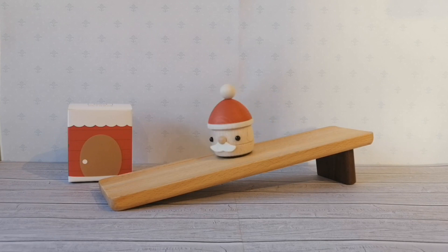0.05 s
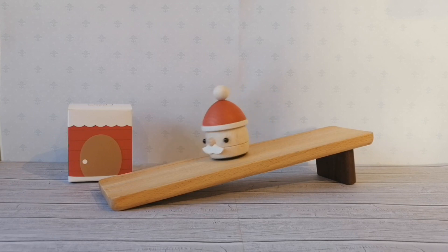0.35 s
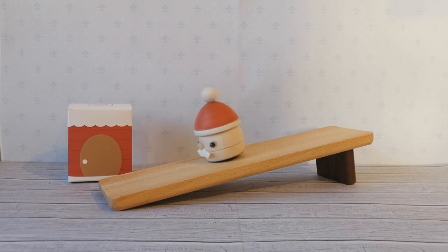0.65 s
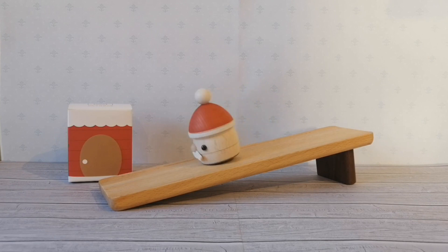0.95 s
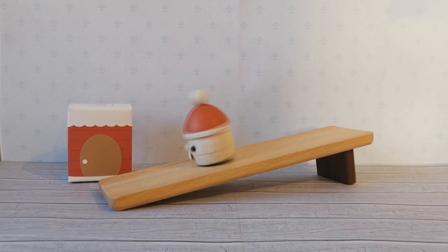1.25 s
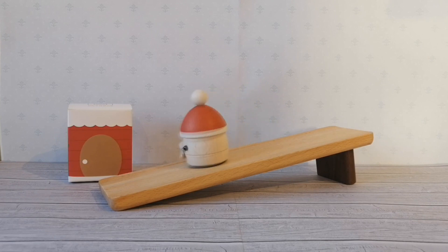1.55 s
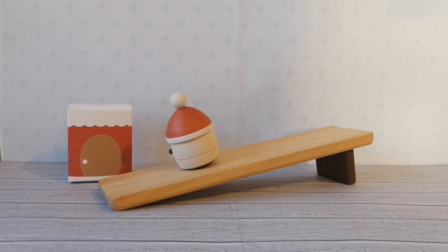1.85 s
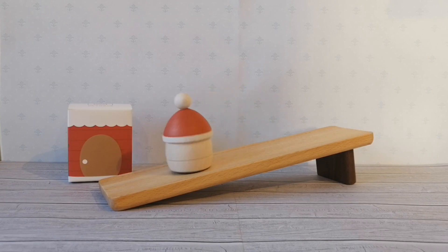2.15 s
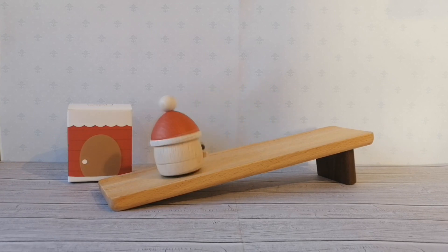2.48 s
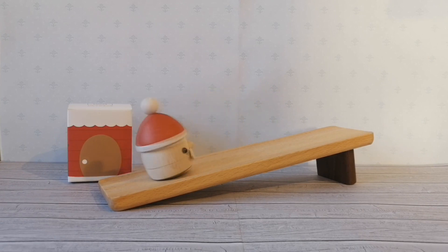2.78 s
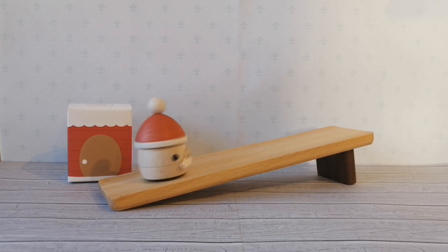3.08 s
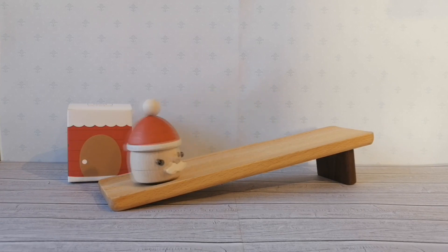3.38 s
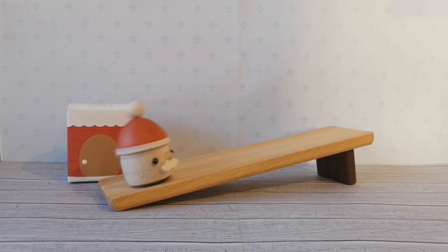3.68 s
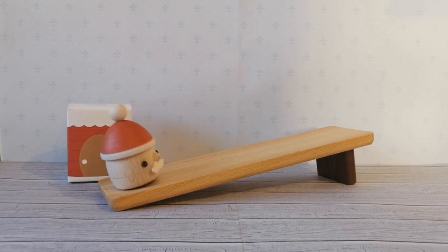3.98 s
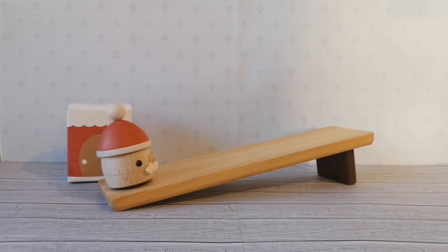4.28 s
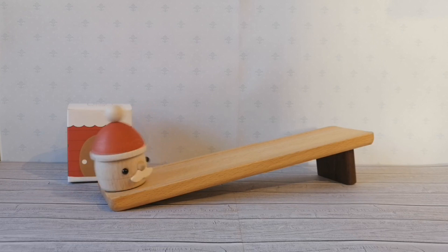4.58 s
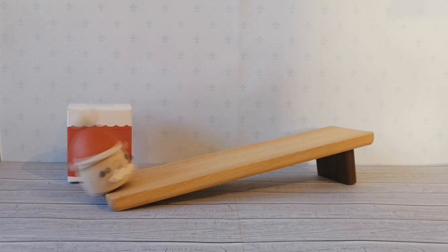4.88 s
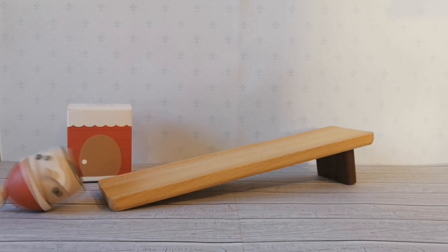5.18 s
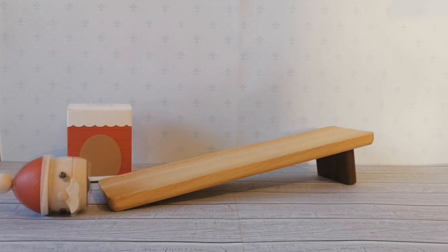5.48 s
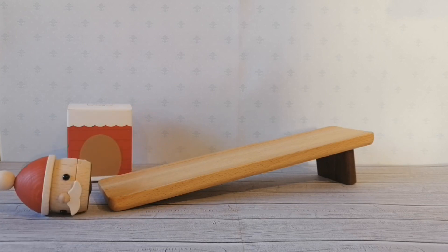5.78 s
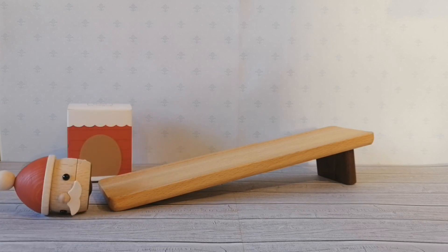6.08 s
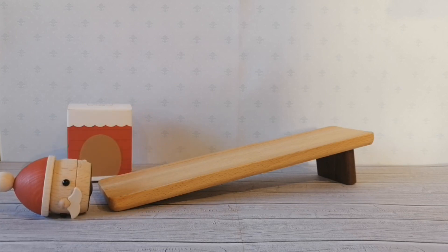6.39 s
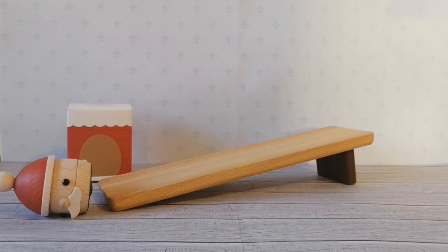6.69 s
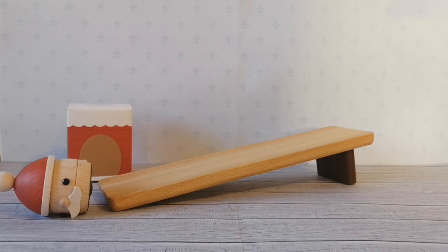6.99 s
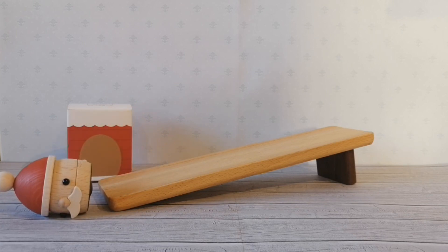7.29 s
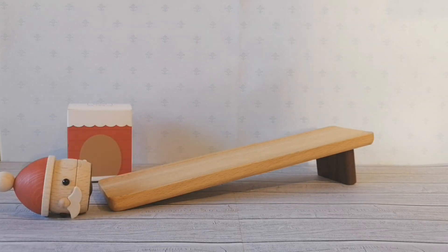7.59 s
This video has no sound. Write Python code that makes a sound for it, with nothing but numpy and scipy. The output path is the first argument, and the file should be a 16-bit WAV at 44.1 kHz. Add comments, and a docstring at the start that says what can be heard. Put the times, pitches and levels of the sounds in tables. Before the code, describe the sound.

A small wooden toy clacks unevenly down a wooden ramp, then topples onto a table and clatters to rest in a quiet room.

```python
"""A wooden walking toy waddles down a small wooden ramp on a table, rocking from foot to foot about
four times a second. Each step thuds in the table, rings the plank and clacks in the toy, whose sole
skids and whose loose leg ticks against its stops. At the foot of the ramp it topples onto the table,
bounces and rattles to rest. Blows are decaying wood modes plus bursts of shaped noise, heard by two
close microphones in a small, quiet room."""
import sys
import numpy as np
from scipy import signal
from scipy.fft import rfft, irfft
from scipy.io import wavfile
from scipy.ndimage import uniform_filter1d

SR = 44100
rng = np.random.default_rng(int(sys.argv[2]) if len(sys.argv) > 2 else 0)


def pcm_store(signal):
    """Save signal as 16-bit PCM."""
    levels = np.round(np.clip(np.atleast_2d(signal), -1, 1) * 32767)
    wavfile.write(sys.argv[1], SR, levels.astype(np.int16).T)


N = 337365
HIT_T = np.arange(SR // 4) / SR  # seconds within one hit

# Footfalls: each rings the plank and clacks in the toy; the plank rings least midway down the ramp, most at its
# free end. Each row: start in seconds, plank level in dB, toy level in dB.
FOOTFALLS = [(0.0755, -31, -46), (0.1111, -22, -21), (0.172, -37.5, -39), (0.23, -39.5, -52),
             (0.3003, -22.5, -28), (0.351, -27, -26.5), (0.426, -28.5, -35.5), (0.478, -45, -53),
             (0.5352, -26.5, -30.5), (0.5999, -24.5, -25), (0.6704, -32, -29.5), (0.7776, -26, -30),
             (0.836, -32, -28.5), (1.0328, -23.5, -26.5), (1.0957, -32.5, -39.5), (1.1512, -34.5, -50),
             (1.3039, -27.5, -26), (1.3557, -28, -23), (1.4211, -26.5, -24), (1.5279, -32.5, -41.5),
             (1.5945, -36.5, -30.0), (1.7394, -31, -36.5), (1.777, -38.0, -38.5), (1.9657, -40.5, -23),
             (2.01, -32.5, -21.5), (2.1342, -42.5, -33.5), (2.2121, -39, -22.0), (2.319, -49, -33.5),
             (2.388, -32, -27), (2.579, -38, -26), (2.7369, -36, -30.5), (2.927, -25.5, -34.5),
             (2.946, -32.5, -23.5), (3.022, -29, -34.5), (3.1382, -33.0, -35), (3.193, -29.5, -34.0),
             (3.3537, -24, -28.5), (3.3761, -34, -27.5), (3.443, -29.5, -30.5), (3.6248, -28.5, -36.5),
             (3.652, -32, -40), (3.7061, -33.5, -40), (3.8061, -30.5, -39.5), (3.884, -26.5, -28),
             (3.9669, -24.5, -30), (4.015, -32.5, -37), (4.0747, -28, -36.5), (4.154, -27, -30.5),
             (4.222, -25.5, -29.5), (4.356, -22, -37), (4.374, -27.5, -38), (4.4384, -25.5, -28),
             (4.5853, -17, -30.5), (4.605, -21.5, -25.5), (4.6648, -18.5, -32), (4.784, -38.5, -58),
             (4.8109, -28.5, -47), (4.873, -38, -56), (4.914, -26.5, -39.5), (5.001, -17, -22.5)]
# A usual step along the ramp. Each row: time in seconds, thud in dB, thud centre in Hz, skid in dB.
RAMP_PATH = [(0, -28.5, 210, -52), (1.5, -28.5, 241, -39.5), (2.199, -27.5, 193.5, -37.5),
             (2.75, -26.5, 183, -66.5), (3.4, -27.5, 190, -76), (4.1, -34.5, 183, -58.5),
             (5, -36, 230, -48)]
# Plank ring, toy clack and table thud. Each row: pitch in Hz, relative level in dB, t60 in seconds.
PLANK_MODES = [(502.2, -18.5, 0.12), (810.5, -9, 0.12), (1032.3, 8, 0.044), (1144, -6, 0.17)]
TOY_MODES = [(1538, -9.5, 0.068), (1725, -5.5, 0.074), (1856, 2.5, 0.019), (3134, -17, 0.05)]
THUD_MODES = [(177.6, -4, 0.15), (193.3, -2, 0.24), (284.14, 3.5, 0.19), (327.7, -14.5, 0.27),
              (493.6, -5, 0.17)]
# Noise of the dull knock, the clack and the skid. Each row: frequency in Hz, relative level in dB.
KNOCK_EQ = [(70, -34.5), (150, -4.5), (290, 0.5), (400, -13.5), (510, -2), (950, -9), (1350, -10),
            (7000, -61.5)]
CLACK_EQ = [(500, -14.5), (1350, -9), (1850, 9.5), (2700, -5), (3200, -15.5), (4100, -24.5), (5500, -32.5),
            (12000, -70)]
SKID_EQ = [(900, -10.5), (2200, 13.5), (2700, 0.5), (3400, 2.5), (5000, -12.5), (8000, -33.5)]


def steps(usual_db=-27, plank_pan_db=-2.5):
    """A foot lands and skids: toy and plank ring at once, the table swells more slowly."""
    out = np.zeros((2, N))
    pan = undb(np.array([[1], [-1]]) * plank_pan_db / 2)
    when, *curves = np.transpose(RAMP_PATH)
    for s, plank_db, toy_db in FOOTFALLS:
        force_db = 10 * np.log10(undb(plank_db) ** 2 + undb(toy_db) ** 2) - usual_db
        thud_db, thud_hz, skid_db = (np.interp(s, when, curve) for curve in curves)
        plank = pan * ring(repitch(PLANK_MODES), spread=0.62, rise_s=0.00089)
        toy = ring(repitch(TOY_MODES), spread=0.56)
        # a harder contact wakes more of the toy's dense high modes
        toy += undb(-8.5 + 0.25 * force_db) * grain(CLACK_EQ, t60=0.052)
        knock = undb(-34 + 0.72 * force_db) * grain(KNOCK_EQ, t60=0.06, width=0.37)
        thud = ring(favour(THUD_MODES, thud_hz, slope_db=7.5), spread=0.14, rise_s=0.0025)
        thud *= undb(thud_db + 0.51 * force_db)
        skid = undb(skid_db + force_db) * rattle(SKID_EQ, t60=0.097, rough_db=7.5, rise_s=0.0087)
        add(out, s, undb(plank_db) * plank + undb(toy_db) * toy + knock + thud + skid)
    return out


# Soft pushes on the table. Each row: start in seconds, level in dB, centre in Hz.
SOLE_ROLLS = [(0.006, -29.5, 191), (0.305, -31, 278), (0.542, -29, 288), (0.735, -29, 179),
              (0.972, -25.5, 190), (1.043, -27.5, 290), (1.246, -27.5, 183), (1.535, -28.5, 291),
              (1.685, -27.5, 188), (1.746, -31.5, 270), (1.903, -30, 170), (1.973, -25.5, 276),
              (2.089, -29.5, 287), (2.396, -24.5, 191), (2.632, -25.5, 178), (2.859, -25.5, 178),
              (3, -26.5, 179), (3.282, -30.5, 169), (3.449, -31, 190), (3.687, -28.5, 215),
              (3.926, -32.5, 167), (4.293, -32, 243), (4.666, -29, 171), (4.89, -28, 223),
              (5.621, -30, 175)]


def sole_rolls():
    """The rounded sole rolls over without a click; only the table's low modes answer."""
    out = np.zeros((2, N))
    for s, db, centre_hz in SOLE_ROLLS:
        modes = favour(THUD_MODES, centre_hz, slope_db=14.0)
        add(out, s, undb(db) * ring(modes, spread=0.11, rise_s=0.0022))
    return out


# Leg ticks, on the ramp and in the tumble. Each row: start in seconds, strength in dB.
LEG_TICKS = [(0.036, -57.5), (0.2863, -50), (0.5295, -53.5), (0.769, -42.5), (0.9125, -61), (1.0194, -49),
             (1.5226, -41), (1.7315, -45.5), (1.951, -53), (2.3178, -54), (2.4257, -43), (2.7162, -57.5),
             (3.319, -60.5), (3.353, -52), (3.8032, -42), (4.0135, -39.5), (4.068, -47.5), (4.555, -61),
             (4.61, -48), (4.7557, -62.5), (5.547, -35), (5.58, -45)]
# The leg's tiny ping. Each row: pitch in Hz, relative level in dB, t60 in seconds.
LEG_MODES = [(4500, 0, 0.007)]
# Its bright buzz and dry snap. Each row: frequency in Hz, relative level in dB.
BUZZ_EQ = [(2000, -8.5), (4500, 0.5), (5200, -13), (6200, -6.5), (8500, -29)]
SNAP_EQ = [(500, -11), (1700, 21), (3200, 8), (6500, -19), (14500, -46.5)]


def leg_ticks(usual_db=-48):
    """The small, hard, loose leg snaps against its stop and buzzes for an instant."""
    out = np.zeros((2, N))
    for s, db in LEG_TICKS:
        ping = undb(db + 8) * ring(repitch(LEG_MODES, scatter=0.035), spread=1.0)
        buzz = undb(db - 6) * grain(BUZZ_EQ, t60=0.046)
        snap = undb(-32 + 0.6 * (db - usual_db)) * grain(SNAP_EQ, t60=0.013)
        add(out, s, ping + buzz + snap)
    return out


# The body bouncing on the table. Each row: start in seconds, knock in dB, crack in dB.
BODY_HITS = [(5.077, -14, -31.5), (5.083, -19, -15.5), (5.089, -12, -25), (5.11, -13, -7.5),
             (5.117, -14, -8), (5.16, -25, -23), (5.205, -17, -22), (5.361, -9.5, -11),
             (5.383, -19.5, -32.5), (5.518, -15.5, -21.5), (5.61, -15.5, -24.5)]
# The hat knocking as the toy rolls about. Each row: start in seconds, level in dB.
HAT_HITS = [(5.115, -18), (5.152, -14), (5.218, -18.5), (5.545, -12), (5.576, -19), (5.698, -19.5)]


def tumble(calming_db_per_s=57):
    """The toy hits the table with body and hat; the body blows shake its loose parts into a clatter."""
    out = np.zeros((2, N))
    for s, knock_db, crack_db in BODY_HITS:
        calmed_db = calming_db_per_s * (s - BODY_HITS[0][0])  # the toy loses speed
        clatter = rattle(CRACK_EQ, t60=0.18, rough_db=1.5, rise_s=0.0048)
        blow = table_blow(knock_db, hat_db=crack_db - 16.5, crack_db=crack_db)
        add(out, s, blow + undb(crack_db - 17 - calmed_db) * clatter)
    for s, db in HAT_HITS:
        add(out, s, table_blow(knock_db=db - 4.5, hat_db=db, crack_db=db - 8))
    # the blows carry little deep bass
    return signal.sosfilt(signal.butter(2, 175, "highpass", fs=SR, output="sos"), out)


# Ring of the table top and of the hat. Each row: pitch in Hz, relative level in dB, t60 in seconds.
TABLE_MODES = [(194.2, -9.5, 0.25), (285.4, 3.5, 0.16), (329.7, -10.5, 0.43), (510, -1, 0.21),
               (597.4, -1, 0.16), (687, 2.5, 0.084), (773, 2.5, 0.059), (820, 7.5, 0.071),
               (908, 7.5, 0.027), (1099, 3.5, 0.079), (1680, 1.5, 0.069)]
HAT_MODES = [(2150, 0.5, 0.025), (2287, 2, 0.032), (2420, -0.5, 0.028)]
# The bite of crack and clatter. Each row: frequency in Hz, relative level in dB.
CRACK_EQ = [(700, -2.5), (1600, 20), (3000, 3.5), (4800, -5), (6500, -12), (12000, -28.5), (14000, -55)]


def table_blow(knock_db, hat_db, crack_db):
    """One blow of the toy on the bare table: a woody knock, the ring of the hat and a short crack."""
    knock = ring(TABLE_MODES, spread=0.2, rise_s=0.00055)
    knock += undb(-8.5) * grain(KNOCK_EQ, t60=0.1)
    knock += undb(-16) * ring(TOY_MODES, spread=0.9)
    hat = ring(HAT_MODES, spread=0.45)
    crack = grain(CRACK_EQ, t60=0.011)
    return undb(knock_db) * knock + undb(hat_db) * hat + undb(crack_db) * crack


# The last to-and-fro roll, fading to rest. Each row: time in seconds, level in dB.
SETTLING_FADER = [(5.661, -43.5), (5.82, -56.5), (5.98, -54), (6.08, -87)]


def settling():
    """The fallen toy rolls over the grain of the table, which murmurs in its lower modes."""
    bumps = rng.standard_normal((1, N))
    rolling = signal.fftconvolve(bumps, ring(TABLE_MODES, spread=0.19), axes=1)[:, :N]
    murmur = colour(rolling, [(190, 2.5), (300, -6.0), (500, -6.5), (900, -24)])
    level_db = np.interp(np.arange(N) / SR, *np.transpose(SETTLING_FADER), left=-np.inf, right=-np.inf)
    return undb(level_db) * unit(murmur)


def ring(modes, spread, rise_s=0.00017, scatter_db=1.5, detune=0.003):
    """One blow on a set of modes, weighted anew by each contact; spread parts their phases in stereo."""
    hz, db, t60 = np.transpose(modes)[:, :, None]
    size, shift, turn = rng.standard_normal((3, len(modes), 1))
    envelope = undb(db + scatter_db * size) * fade(HIT_T, t60) * attack(HIT_T, rise_s)
    phase = 2 * np.pi * hz * (1 + detune * shift) * HIT_T
    sound = np.array([(envelope * np.sin(phase + side * spread * turn)).sum(0) for side in (1, -1)])
    return sound / np.abs(sound).max()


def repitch(modes, scatter=0.012):
    """The toy bears on another spot at each contact, which shifts the modes a little."""
    shift = 1 + scatter * rng.standard_normal()
    return [(hz * shift, db, t60) for hz, db, t60 in modes]


def favour(modes, centre_hz, slope_db):
    """A contact drives best the modes near its own pace; the others lose slope_db an octave."""
    return [(hz, db - slope_db * abs(np.log2(hz / centre_hz)), t60) for hz, db, t60 in modes]


def grain(spectrum, t60, width=0.71):
    """Countless short-lived modes as a noise burst, partly unlike at the two microphones."""
    mid, side = colour(rng.standard_normal((2, len(HIT_T))), spectrum)
    noise = unit(np.array([mid + width * side, mid - width * side]))
    return noise * fade(HIT_T, t60) * (1 - fade(HIT_T, 0.002)) ** 2


def rattle(spectrum, t60, rough_db, rise_s, contacts_per_s=700):
    """Wood skidding or clattering on wood: a dense run of uneven tiny contacts that dies away."""
    n = len(HIT_T)
    sizes = undb(rough_db * np.repeat(rng.standard_normal(n), SR // contacts_per_s)[:n])
    run = unit(colour(sizes * rng.standard_normal((2, n)), spectrum))
    return run * fade(HIT_T, t60) * attack(HIT_T, rise_s)


# The toy drifts left. Each row: time in seconds, lag of the right microphone in seconds.
RIGHT_LAG = [(0, 0.000018), (5.1, 0.00021)]


def add(out, s, sound):
    """Place a stereo hit at time s; it reaches the right microphone a little later."""
    lag_s = np.interp(s, *np.transpose(RIGHT_LAG))
    for channel, start in enumerate((s, s + lag_s)):
        i = max(int(start * SR), 0)
        part = sound[channel, :N - i]
        out[channel, i:i + len(part)] += part


# Early reflections. Each row: left delay in seconds, right delay in seconds, gain.
WALL_ECHOES = [(.0041, 0.0038, 0.45), (0.016, 0.017, 0.34)]
# Length of the reverb tail. Each row: frequency in Hz, t60 in seconds.
TAIL_DECAY = [(280, .33), (650, .47), (2500, .45), (12000, .28)]
# Its warm tone. Each row: frequency in Hz, relative level in dB.
TAIL_EQ = [(100, 4.5), (280, 2.5), (420, 5), (600, 1.5), (1000, -5.5), (2000, -4)]


def room(dry, wet_db, build_s):
    """Two near wall echoes, then a diffuse tail whose top end dies first."""
    t = np.arange(SR) / SR
    hz = np.fft.rfftfreq(SR, 1 / SR)
    mid, side = rfft(rng.standard_normal((2, SR)))
    likeness = 0.97 * np.sinc(hz / 1700)  # the bass is alike at both microphones
    noise = mid * np.sqrt(1 + likeness) + np.outer([1, -1], side * np.sqrt(1 - likeness))
    noise *= undb(along(TAIL_EQ, hz))
    centres, t60s = np.transpose(TAIL_DECAY)
    bands = [along(np.c_[centres, share], hz) for share in np.eye(len(t60s))]
    tail = sum(irfft(noise * band, SR) * fade(t, t60) for band, t60 in zip(bands, t60s))
    response = undb(wet_db) * unit(tail * attack(t, build_s)) / np.sqrt(SR)
    response[:, 0] += 1  # direct sound
    for left_s, right_s, gain in WALL_ECHOES:
        response[[0, 1], [int(left_s * SR), int(right_s * SR)]] += gain
    response = even(response, narrow_hz=40, wide_hz=260)
    return signal.fftconvolve(dry, response, axes=1)[:, :N]


def even(response, narrow_hz, wide_hz):
    """Level the narrow peaks and dips of a one-second response so that no single note sticks out."""
    spectrum = rfft(response)
    power = np.abs(spectrum) ** 2
    narrow, wide = (uniform_filter1d(power, width) + 1e-9 for width in (narrow_hz, wide_hz))
    cepstrum = irfft(np.log(wide / narrow))
    cepstrum[:, 0] /= 2
    cepstrum[:, SR // 2:] = 0  # minimum phase: no pre-ringing
    return irfft(spectrum * np.exp(rfft(cepstrum)))


# Room tone, heavy in the lows. Each row: frequency in Hz, relative level in dB.
ROOM_TONE_EQ = [(22, -5), (75, -1), (115, -2), (170, -16), (700, -28.5), (3000, -36.5), (7500, -52.5),
                (14500, -65.5)]


def background(air_db=-50.08, drone_db=-53.5):
    """Low rumble of the building with a wavering drone, under faint hiss."""
    mid, side = colour(rng.standard_normal((2, N)), ROOM_TONE_EQ)
    side = colour(side, [(100, -14), (600, 0)])  # nearly mono in the bass
    air = unit(mid + np.outer([1, -1], side))
    drone_band = signal.butter(2, [67, 75], "bandpass", fs=SR, output="sos")
    drone = unit(signal.sosfilt(drone_band, rng.standard_normal(N)))
    return undb(air_db) * air + undb(drone_db) * drone


def undb(db):
    """Decibels to gain."""
    return 10 ** (np.asarray(db) / 20)


def along(points, hz):
    """Read (Hz, value) points on a log-frequency axis."""
    f, value = np.transpose(points)
    return np.interp(np.log(np.maximum(hz, 1)), np.log(f), value)


def colour(x, points):
    """EQ a sound with a (Hz, dB) curve."""
    n = x.shape[-1]
    return irfft(rfft(x) * undb(along(points, np.fft.rfftfreq(n, 1 / SR))), n)


def unit(x):
    """Scale to rms 1."""
    return x / np.sqrt(np.mean(x ** 2))


def attack(t, rise_s):
    """Smooth onset from 0 to 1."""
    return 1 - np.exp(-(t / rise_s) ** 2)


def fade(t, t60):
    """Exponential decay, 60 dB down at t60."""
    return np.exp(-np.log(1000) * t / t60)


def scene():
    """The toy's walk and fall, heard in the room."""
    toy = steps() + sole_rolls() + leg_ticks() + tumble() + settling()
    return room(toy, wet_db=-5.5, build_s=0.0032) + background()


# Stereo tilt of the microphones. Each row: frequency in Hz, left minus right in dB.
MIC_TILT = [(280, 0), (550, -2.5), (1000, 0), (4500, 0.5)]


def record(dry, top_hz=14800):
    """Each microphone has its own slight colour; a steep low-pass cuts the top."""
    left = colour(dry[0], [(hz, db / 2) for hz, db in MIC_TILT])
    right = colour(dry[1], [(hz, -db / 2) for hz, db in MIC_TILT])
    return signal.sosfilt(signal.ellip(8, 0.2, 70, top_hz, fs=SR, output="sos"), [left, right])


dry = scene()
out = record(dry)
pcm_store(out)
```